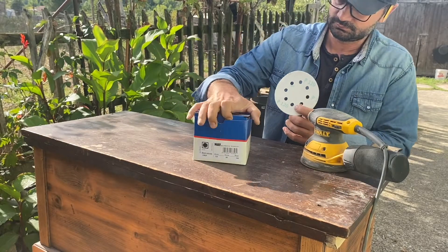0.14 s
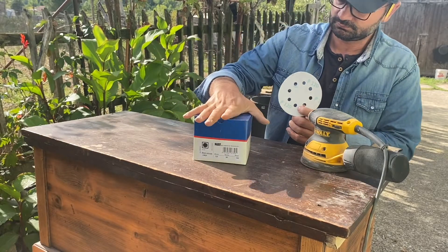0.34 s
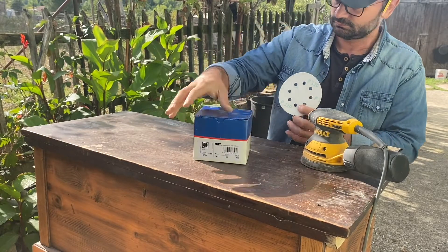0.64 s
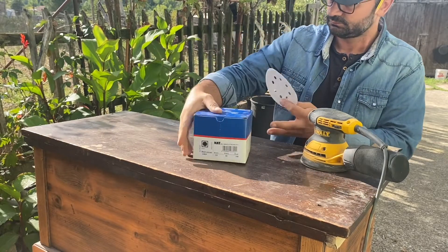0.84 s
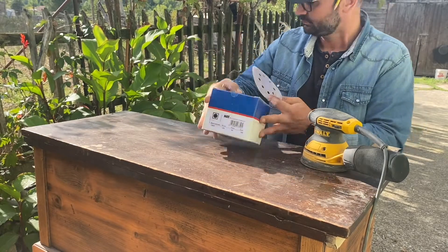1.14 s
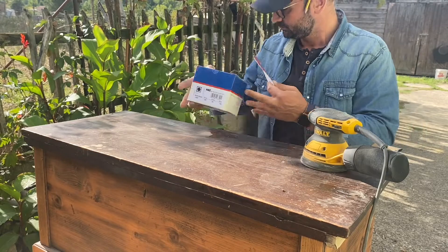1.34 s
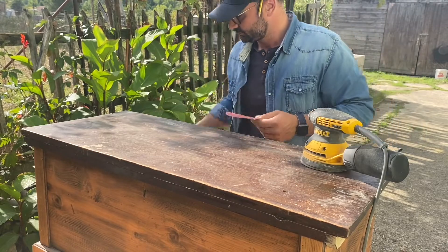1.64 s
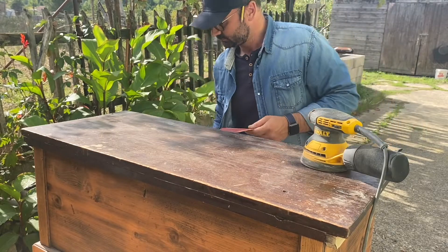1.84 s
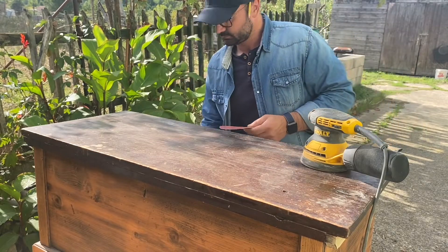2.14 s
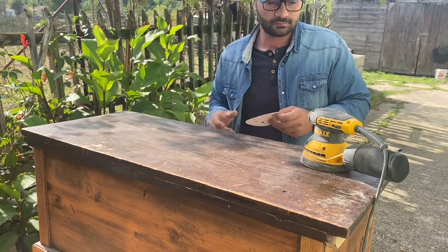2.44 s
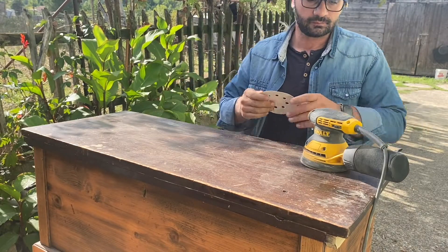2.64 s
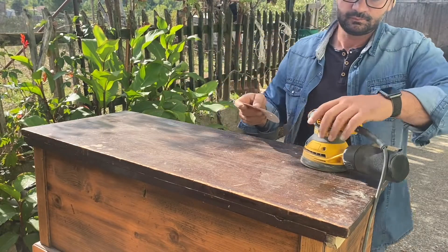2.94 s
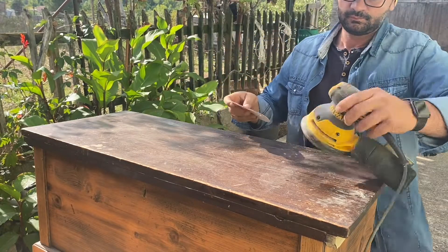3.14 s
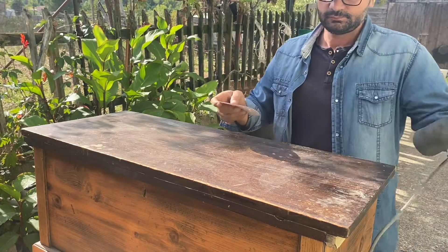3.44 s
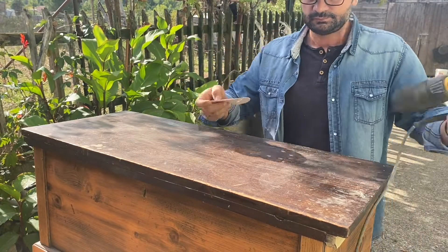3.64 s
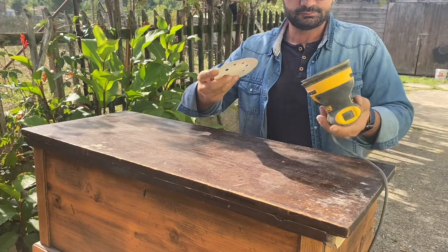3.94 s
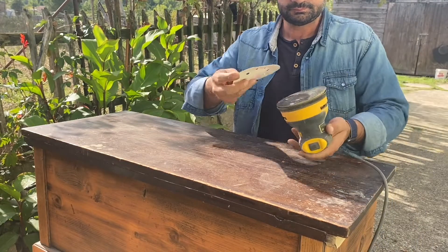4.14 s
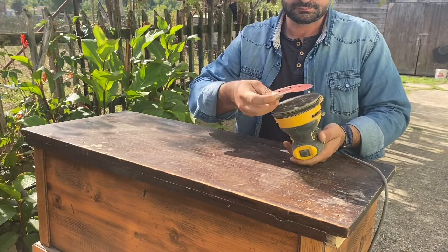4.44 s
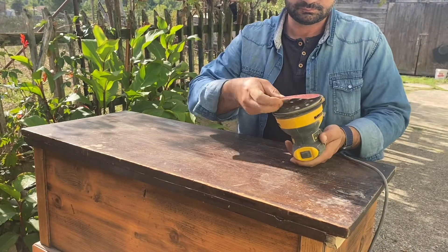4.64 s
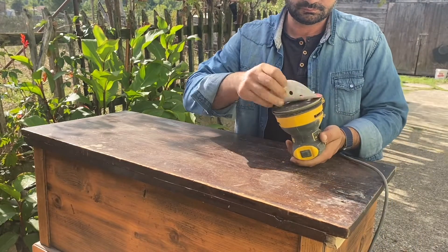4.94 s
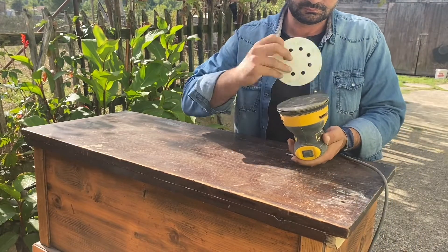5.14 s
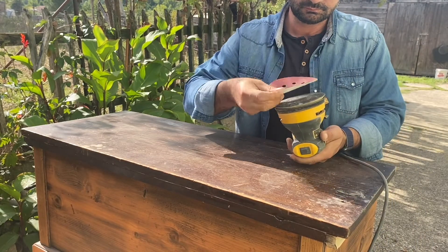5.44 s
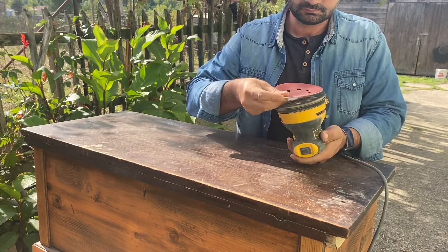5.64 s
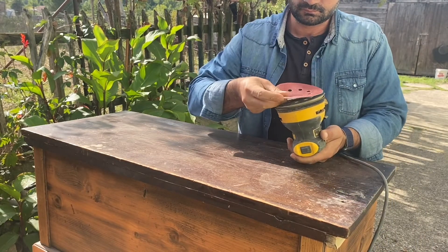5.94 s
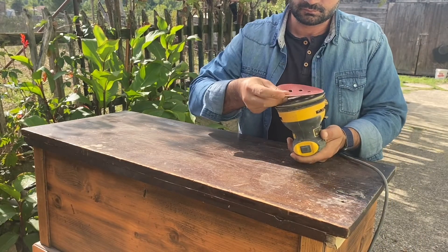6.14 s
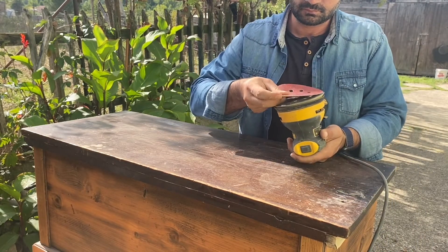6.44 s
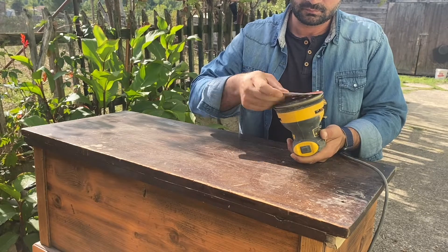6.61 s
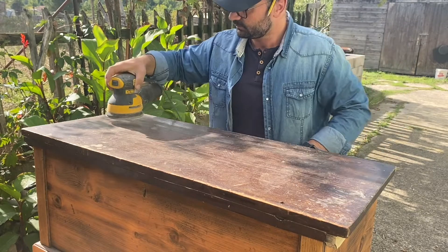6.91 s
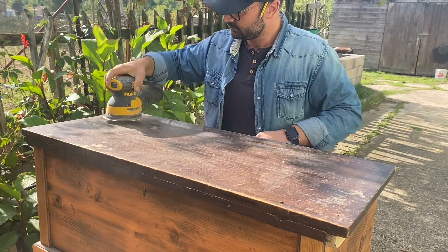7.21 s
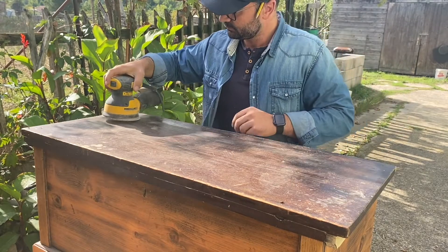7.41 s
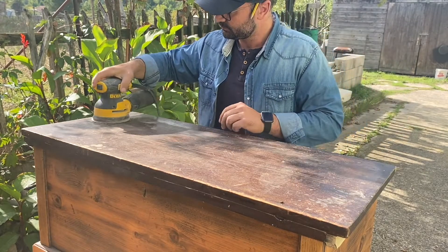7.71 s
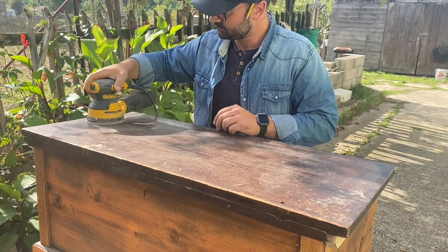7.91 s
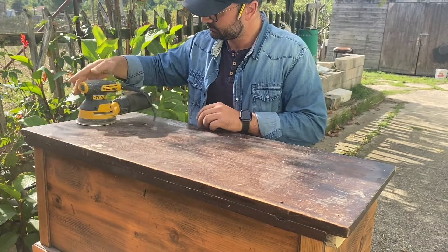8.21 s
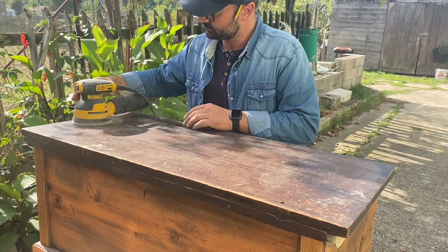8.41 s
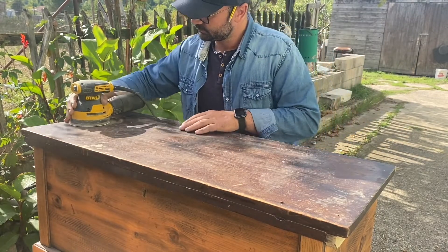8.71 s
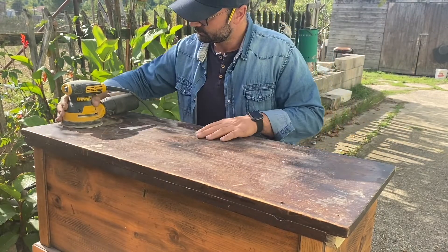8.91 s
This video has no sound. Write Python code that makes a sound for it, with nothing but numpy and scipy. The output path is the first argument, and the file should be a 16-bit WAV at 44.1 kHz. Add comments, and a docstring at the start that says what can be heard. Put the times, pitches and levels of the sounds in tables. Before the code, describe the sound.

A cardboard box knocks and rustles in a quiet garden, a sanding disc rips off its pad, then an electric sander whines up and grinds on wood.

```python
"""An orbital sander whines up to speed, bumps a wooden chest and settles on its lid, which drones under the pad.
Its tones ride on multiples of shaft speed over rushing air; chatter and scraping grit follow the pad's pressure.
Before that, in a garden, a cardboard box of sanding discs knocks and rustles as it is shut and put down,
and a disc is peeled off the hook-and-loop pad: struck modes and shaped noise. Fence and sheds answer the
knocks, taps and peel; a low outdoor rumble lies underneath."""
import sys
import numpy as np
from scipy import signal
from scipy.fft import rfft, irfft, next_fast_len
from scipy.io import wavfile
from scipy.ndimage import uniform_filter1d, map_coordinates

SR = 44100
rng = np.random.default_rng(int(sys.argv[2]) if len(sys.argv) > 2 else 0)


def store_pcm(level_fs):
    """Save levels as 16-bit WAV."""
    pcm = np.round(np.clip(level_fs, -1, 1) * 32767).astype(np.int16)
    wavfile.write(sys.argv[1], SR, np.atleast_2d(pcm).T)


N = 399987

# knocks of the box: (t/s, relative level/dB, thud/dB, crack/dB, pitch ratio)
KNOCKS = [(0.014, -36.5, -20, -32, 0.99), (0.174, -10, -11, -18.5, 0.99), (0.918, -42, -22, -10, 1.05),
          (1.385, -46.5, 5, -21, 0.84), (1.433, -44, -29, -16, 0.845), (1.453, -37, -33, -26, 1.1),
          (1.476, -31, -38, -46, 1.15), (1.517, -39, -25, -41, 1.15), (1.573, -44, -22.5, -40, 0.67),
          (1.681, -54, -22, -34, 0.63), (1.849, -43, 3, -28, 0.71), (1.914, -21, -14, -22.5, 0.88),
          (1.948, -36.5, 3, -31, 0.83), (2.029, -46.5, 2.5, -32.5, 0.76)]
# noise of knocked wood: (f/Hz, relative level/dB)
WOOD = [(100,-14),(220,-3),(330,-1.5),(480,-7.5),(780,-4.5),(1100,-23.5),(2000,-45.5)]
# bright noise of sliding paper: (f/Hz, relative level/dB)
SLIDE = [(150,-28),(1000,-12.5),(3000,-2),(5000,-2),(7200,-3.5),(9000,-4),(12000,-3.5),(15500,-7)]
# likeness of the two channels for sounds of the hands: (f/Hz, likeness 0-1)
HAND_ALIKE = [(100,1),(600,0.29),(2300,.85),(3800,.45),(6500,0.77),(10800,1)]
# likeness of the two channels for the sander, held within 0-1: (f/Hz, likeness)
SANDER_ALIKE = [(750,3.5),(900,0.78),(3000,0.73),(4500,-0.06),(6500,0.77),(8500,0.84),(10800,0.6),(11400,1)]
# sander's level difference between the microphones: (f/Hz, L-R/dB)
SANDER_BALANCE = [(60, -2), (130, -6), (270, 4), (580, -11), (1240, 2), (2640, 0.5), (5630, -1.5),
                  (12000, 0)]
# sander's phase difference between the microphones: (f/Hz, left lead/rad)
SANDER_PHASE = [(450,1.5),(900,1.62),(1800,1.3),(3000,2.15),(3800,5.2),(5500,2 * np.pi)]

# the shaft starts at START_HZ and heads for FREE_HZ until the load holds it at LOADED_HZ
ON_S, ON_RISE_S, SPIN_UP_S = 6.68, 0.027, .5
START_HZ, FREE_HZ, LOADED_HZ = 98.9, 152.8, 147.7
RUSH_POWER = 2.58  # the free-running sound grows as this power of speed


def amp(db):
    """Decibels to gain."""
    return 10 ** (np.asarray(db) / 20)


def unit(x):
    """Scale to rms 1."""
    return x / np.sqrt(np.mean(x ** 2) + 1e-20)


def clock():
    """Seconds at each sample."""
    return np.arange(N) / SR


def along(points, hz):
    """(Hz, value) points read on a log axis."""
    f, v = np.transpose(points)
    return np.interp(np.log(hz + 1), np.log(f + 1), v)


def wobble(rate):
    """A smooth random curve, rate knots a second."""
    knots = rng.standard_normal(int(N * rate / SR) + 4)
    return map_coordinates(knots, [np.arange(N) * rate / SR])


def filtered(x, response):
    """x times a complex response of frequency."""
    m = next_fast_len(x.shape[-1] + 8192)
    spectrum = rfft(x, m) * response(np.fft.rfftfreq(m, 1 / SR))
    return irfft(spectrum, m)[..., :x.shape[-1]]


def coloured(x, spectrum):
    """x given a spectrum, at rms 1."""
    return unit(filtered(x, lambda hz: amp(along(spectrum, hz))))


def noise(spectrum, grain=0.):
    """Two noises; grain spreads the sizes of their tiny impacts, in step in both."""
    sizes = np.exp(grain * rng.standard_normal(N))
    return coloured(rng.standard_normal((2, N)) * sizes, spectrum)


def patchy(x, depth_db):
    """Narrow patches of the spectrum swell and fade at random."""
    z = signal.stft(x, nperseg=1024)[2]
    field = uniform_filter1d(rng.standard_normal(z.shape[1:]), 4, 0)
    field = uniform_filter1d(field, 6, 1)
    return unit(signal.istft(z * amp(depth_db * unit(field)), nperseg=1024)[1][:, :N])


def stereo(pair, alike):
    """Two unrelated signals become partly alike channels."""
    def mix(hz):
        turn = np.arccos(np.clip(along(alike, hz), 0, 1)) / 2
        return np.array([np.cos(turn), np.sin(turn)])
    mid, side = filtered(pair, mix)
    return np.array([mid + side, mid - side])


def placed(x, balance, phase=None):
    """Level (Hz, L-R dB) and phase (Hz, radians) differences between the two channels."""
    half = np.array([[.5], [-.5]])

    def response(hz):
        lead = 0 if phase is None else along(phase, hz)
        return amp(half * along(balance, hz)) * np.exp(1j * half * lead)
    return filtered(x, response)


def add(track, s, sound):
    """Mix a sound in at s seconds."""
    part = track[..., max(round(s * SR), 0):][..., :sound.shape[-1]]
    part += sound[..., :part.shape[-1]]


def ring(modes, t, rise, lag=0., scatter_db=3.5):
    """Struck modes; bending waves bring the low ones later (lag s at 1 kHz)."""
    out = np.zeros(len(t))
    for hz, db, t60 in modes:
        age = np.maximum(t - lag * np.sqrt(10 ** 3 / hz), 0)
        decay = amp(db + scatter_db * rng.normal() - 60 * age / t60)
        out += decay * np.sin(2 * np.pi * hz * age) * (1 - np.exp(-age / rise))
    return out


def outdoors():
    """A low, slowly changing rumble under a faint hiss."""
    # distant rumble: (t/s, relative level/dB)
    swell = [(0.0, -58.5), (0.4, -54.5), (3.77, -57), (4.32, -59.5), (5.4, -59), (6.27, -65), (6.6, -61.5)]
    # outdoor noise: (f/Hz, relative level/dB)
    spectrum = [(20,-26.5),(45,-11.5),(70,-3),(100,-1.5),(150,-9),(220,-16.5),(320,-22),(480,-35.5),(900,-49),(2000,-52.5),(5000,-50.5),(12000,-61)]
    rumble = amp(1 + np.interp(clock(), *np.transpose(swell)))
    wide = stereo(rumble * noise(spectrum), [(100,.97),(400,0.72),(2000,.4)])
    return placed(wide, balance=[(100,-3.5),(1000,-2)])


def yard(x):
    """The scattered answer of fence and sheds: decaying noise, new for each channel."""
    # decay of the scattered sound: (f/Hz, t60/s)
    decay = [(150,0.46),(600,0.2),(2500,0.13),(10000,0.22)]
    hz, t, z = signal.stft(rng.standard_normal((2, SR // 2)), SR, nperseg=256)
    tail = signal.istft(z * amp(-60 * t / along(decay, hz)[:, None]), SR, nperseg=256)[1]
    tail *= 1 - np.exp(-np.arange(tail.shape[1]) / SR / .006)
    return signal.fftconvolve(x[None], tail / np.linalg.norm(tail[0]), axes=1)


def handling():
    """Card, denim and abrasive paper brush past each other: dull scuff and bright hiss."""
    # strokes of hands, sleeves and card: (start t/s, length/s, relative scuff/dB, relative hiss/dB)
    strokes = [(0.0, 0.0067, -50.5, -58), (0.035, 0.18, -53.5, -59.5), (0.25, 0.04, -61.5, -63.5),
               (0.417, .04, -58, -60.5), (0.53, 0.031, -59.5, -58), (0.587, 0.031, -61, -61.5),
               (0.668, 0.046, -81, -69), (0.771, .17, -60.5, -59), (0.953, .09, -59.5, -64.5),
               (1.126, .08, -72.5, -69.5), (1.21, 0.016, -63, -52.5), (1.24, 0.4, -71.5, -83),
               (1.652, 0.13, -70, -82.5), (1.832, 0.12, -52.5, -61), (2.097, .075, -70.5, -76.5),
               (2.525, 0.042, -70, -71.5), (2.67, .015, -79, -73), (2.786, 0.04, -72, -64),
               (2.867, 0.1, -73.5, -68.5), (2.926, 0.0179, -80, -54), (2.99, 0.22, -73, -72.5),
               (3.264, 0.075, -80, -75), (3.427, 0.13, -66, -70.5), (3.704, 0.18, -64, -67),
               (3.876, 0.23, -78, -76.5), (4.653, 0.19, -93, -58.5), (5.082, 0.22, -71.5, -65.5),
               (5.566, 0.033, -88, -68.5), (5.724, 0.035, -77, -78), (6.12, .21, -91.5, -77.5),
               (6.445, 0.07, -88.5, -67.5), (6.535, 0.061, -86.5, -61)]
    # dull scuffing noise: (f/Hz, relative level/dB)
    scuff_spectrum = [(250,-0.5),(600,-1),(1300,-6.5),(2500,-10.5),(4000,-16.5),(8000,-36)]
    attack, stroke_t60, shake_t60 = .3, 0.18, 0.13  # rise constant as a share of length; s; s
    t = clock()
    sleeves = amp(wobble(9) - 0.5 * t)  # faint denim rustle, calming by 0.5 dB/s
    power = (amp([[-83.5], [-87.5]]) * sleeves) ** 2  # rows: scuff, hiss
    age = t[:SR]
    for s, length, scuff_db, hiss_db in strokes:
        rise = 1 - np.exp(-age / (attack * length))
        stroke = rise * amp(-60 * np.maximum(age - length, 0) / stroke_t60)
        add(power, s, (amp([[scuff_db], [hiss_db]]) * stroke) ** 2)
    for s, db, *_ in KNOCKS:  # card rustles after each knock of the box
        shake = amp(db - 60 * age / shake_t60)
        add(power, s, (amp([[-25], [-38.5]]) * shake) ** 2)
    scuff, hiss = np.sqrt(power)
    card = patchy(noise(scuff_spectrum, grain=.5), 2.5)
    paper = patchy(noise(SLIDE, grain=.5), 2.5)
    rub = amp(3.5) * scuff * card * amp(1.6 * wobble(60))
    rub = rub + amp(1.5) * hiss * paper * amp(0.7 * wobble(78))
    return placed(stereo(rub, HAND_ALIKE), balance=[(500,-1),(5000,0)])


def tumble():
    """The stack of discs slips and rattles as the box is carried off: one clumpy swell of noise."""
    # rattle of the stack: (f/Hz, relative level/dB)
    stack = [(150,-24.5),(430,9.5),(660,10.5),(900,0),(1250,-7),(1400,1),(1600,-26),(2700,-36),(5000,-43)]
    middle_s, half_s = 1.506, 0.075  # half length is to 1/e
    clumps = amp(-44 + 4 * wobble(130))
    swell = clumps * np.exp(-((clock() - middle_s) / half_s) ** 2)
    return stereo(swell * noise(stack, grain=0.72), HAND_ALIKE)


def taps():
    """Tool, cord and switch tick: short bursts of plastic, wood and treble noise."""
    # light taps: (t/s, relative level/dB, treble/dB, wood/dB)
    ticks = [(0.782, -50, -10, 4), (1.222, -35, -9, -4.5), (1.264, -48.5, -23, 6.5),
             (1.321, -50.5, -6, 6.5), (2.552, -52.5, -18, -10), (3.032, -44, -22, -4),
             (3.161, -46.5, -18, 2.5), (3.422, -34, -39, -4.5), (3.568, -27.5, -29, -5),
             (4.578, -36.5, -20, -23), (4.701, -40.5, -11, -8.5), (4.722, -54, -8, -12),
             (6.66, -54, 0, -27), (6.667, -55, 16.5, -13.5)]
    # noise of a tapped plastic shell: (f/Hz, relative level/dB)
    plastic = [(400,-24),(900,0.5),(1200,-1),(1600,-0.5),(2600,-3),(3400,-9.5),(6000,-26),(12000,-43)]
    out, t = np.zeros((2, N)), np.arange(SR // 5) / SR
    for s, db, treble_db, wood_db in ticks:
        shell = amp(-3.0 - 60 * t / 0.043) * coloured(rng.standard_normal(len(t)), plastic)
        wood = amp(wood_db - 0.5 - 60 * t / 0.088) * coloured(rng.standard_normal(len(t)), WOOD)
        treble = amp(treble_db - 60 * t / .03) * coloured(rng.standard_normal(len(t)), SLIDE)
        hit = amp(db - 4.5) * (shell + wood + treble) * (1 - np.exp(-t / .0015))
        add(out, s, hit)
        add(out, s, yard(hit))
    return out


def box():
    """The hollow box knocks: a crack, its damped walls, the discs inside, and a thud underneath."""
    # wall modes: (f at pitch ratio 1/Hz, relative level/dB, t60/s)
    wall_modes = [(290,-10,0.046),(480,-7,0.035),(559.6,0.5,0.048),(696,-3.5,0.04),(1030,-12,0.022),(1410,-7.5,0.012),(1930,-18.5,0.012),(2650,-18,.012)]
    # ground and chest under the box: (f/Hz, relative level/dB)
    thud_spectrum = [(40,-14.5),(90,3),(130,4.5),(200,-7.5),(400,-7.5),(900,-42)]
    disc_spectrum = [(200,-14.5),(400,-6.5),(600,4.0),(800,-3.5),(1400,-13.0),(3000,-31.5),(8000,-52)]
    crack_spectrum = [(300,-8.5),(1200,4.0),(5500,1.0),(12000,-7)]
    out, t = np.zeros((2, N)), np.arange(SR // 3) / SR
    for s, db, thud_db, crack_db, pitch in KNOCKS:
        modes = [(hz * pitch, level, t60) for hz, level, t60 in wall_modes]
        walls = ring(modes, t, rise=.0015, lag=.0012, scatter_db=4.0)
        walls /= np.abs(walls).max()
        discs = amp(-14 - 60 * t / 0.07) * coloured(rng.standard_normal(len(t)), disc_spectrum)
        thud = amp(thud_db - 60 * t / 0.086) * (1 - np.exp(-t / 0.012))
        thud *= coloured(rng.standard_normal(len(t)), thud_spectrum)
        crack = amp(crack_db + 2 - 60 * t / 0.015)
        crack *= coloured(rng.standard_normal(len(t)), crack_spectrum)
        hit = walls + (discs + crack) * (1 - np.exp(-t / 0.00084))
        add(out, s - .001, amp(db + 3.5) * (hit + thud))
        add(out, s, amp(db - 9) * yard(hit))
    return placed(out, balance=[(150,-3),(600,-2.5),(3000,6)], phase=[(300,0.093),(600,1.0),(1500,0.3)])


def peel():
    """Hooks let go of their loops: grainy noise under a steep swell, with some clumps."""
    # clumps of hooks letting go: (t/s, relative level/dB)
    snaps = [(4.8627, -32), (4.889, -31), (4.9095, -30.5), (4.9659, -24), (5.021, -15.5), (5.0455, -21.5),
             (5.0711, -25)]
    # rip of the hooks: (f/Hz, relative level/dB)
    hooks = [(150,-35.5),(330,-11),(440,2),(650,-14),(900,-3),(1400,-11),(2250,-4),(4700,-1),(7500,-4.5),(9500,-8),(11200,-4),(13500,-7),(15500,-6)]
    start_s, hold_s = 4.95, .1  # the full pull
    rise_db_per_s, fall_db_per_s = 370.5, 541
    t, age = np.arange(SR // 30) / SR, clock() - start_s
    swell_db = rise_db_per_s * np.minimum(age, 0) - fall_db_per_s * np.maximum(age - hold_s, 0)
    pull = amp(-33 + swell_db + 3.8 * wobble(260))
    for s, db in snaps:
        add(pull, s, amp(db - 10.0 - 60 * t / 0.018))
    rip = stereo(pull * noise(hooks, grain=1.1), HAND_ALIKE)
    rip = placed(rip, balance=[(500,-1.5),(2500,0.5),(4700,0.5),(8000,-0.5)])
    return rip + amp(-8) * yard(rip[0])[:, :N]


def bumps():
    """The box settles with a thud, later the sander or an arm nudges the chest: clacking boards, booming body."""
    # bumps: (t/s, relative level/dB, rise constant/s, dullness/dB per octave)
    jolts = [(1.965,-41,0.014,3),(2.812,-42,0.019,12.5),(4.165,-47.5,.01,-0.5),(7.288,-24.5,0.017,0.5),(7.566,-21,0.0077,1.5)]
    # booming modes: (f/Hz, relative level/dB, t60/s)
    body = [(56,-12,.25),(77.5,-8.5,0.14),(105,-8,0.25),(130.7,-2,0.17),(188,0,0.11),(363,2,0.044)]
    out, t = np.zeros(N), np.arange(SR // 2) / SR
    for s, db, rise, dull_db in jolts:
        # dullness tilts the modes about 130 Hz
        modes = [(hz, level - dull_db * np.log2(hz / 130), t60) for hz, level, t60 in body]
        boards = amp(-8.5 - 60 * t / 0.113) * (1 - np.exp(-t / rise))
        boards *= coloured(rng.standard_normal(len(t)), WOOD)
        clack = boards * amp(db + 19.0) ** .5  # harder bumps clack more
        add(out, s, amp(db + 3.0) * (ring(modes, t, rise) + clack))
    return placed(out, balance=[(100,-4.0)])


def running():
    """0 before the switch is pressed, 1 just after."""
    return np.clip((clock() - ON_S) / ON_RISE_S, 0, 1)


def shaft_speed():
    """Turns a second: a quick rise that levels off under load."""
    age = np.maximum(clock() - ON_S, 0)
    return np.minimum(FREE_HZ - (FREE_HZ - START_HZ) * np.exp(-age / SPIN_UP_S), LOADED_HZ)


def shaft_angle():
    """Radians turned by the motor, with a slight flutter."""
    return 2 * np.pi * np.cumsum(shaft_speed() * (1 + .0012 * wobble(25))) / SR


def effort():
    """Gain of the free-running machine, 1 at full speed."""
    return running() * (shaft_speed() / LOADED_HZ) ** RUSH_POWER


def pressure():
    """Contact of the pad with the lid: a few grazes, then nearly steady."""
    # how firmly the pad bears on the lid: (t/s, level/dB)
    bearing = [(7.55, -41.5), (7.62, -15), (7.71, -5), (7.88, -1), (8.03, -3.5), (8.22, 0.5), (8.6, 0),
               (8.8, 0.5), (9.07, 0)]
    # the pad grazes the lid before it settles: (t/s, level/dB)
    grazes = [(7.285, -2), (7.34, -14), (7.562, -10.5)]
    rise_s, t60 = .022, .16
    t = clock()
    press = (t > bearing[0][0]) * amp(np.interp(t, *np.transpose(bearing)))
    age = t[:SR // 2]
    for s, db in grazes:
        fade = amp(db - 60 * np.maximum(age - rise_s, 0) / t60)
        add(press, s, np.minimum(age / rise_s, 1) * fade)
    return press


def rocking(depth):
    """The throb of the sander rocking on its pad: round crests, narrow dips."""
    rock_hz, crest_s = 7.115, 8.245  # mean rate, approximate time of one crest
    turn = 2 * np.pi * rock_hz * (clock() - crest_s) + 0.51 * wobble(9.8)
    return np.abs(1 + depth * np.exp(1j * turn))


def motor(angle):
    """Fan blades and commutator bars whine on high shaft orders, over the rush of cooling air."""
    # fan tones: (multiple of shaft speed, relative level/dB)
    fan_orders = [(17,-6),(23,5.5),(46,-16.5),(69,-23)]
    # armature and commutator tones, with the fan's second harmonic at 46: (multiple of shaft speed)
    bar_orders = [11.98, 23.98, 36.2, 46, 48.2, 72]
    # their levels: (relative level spinning up/dB, relative level at full speed/dB)
    bar_levels = [(-61,-50),(-51,-46),(-60,-54.5),(-73,-50),(-45,-53),(-56,-54)]
    # housing resonances the whine sweeps through: (f/Hz, width/Hz, boost/dB)
    housing = [(2350, 150, 11.5), (2646, 33, 12), (3050, 143, 11.5), (3330, 130, 11.5)]
    # cooling air: (f/Hz, relative level/dB)
    air_spectrum = [(80,-27),(220,-15),(330,-10.5),(900,-8),(2200,-12),(3100,-11.5),(3900,-22),(4800,-19.5),(6000,-20),(7500,-18.5),(10000,-22),(12400,-29),(15500,-33)]
    fan_blades, fade_s, fade_db_per_s = 23, 8.1, 8  # the fan's whine fades from fade_s on
    rush, t = effort(), clock()

    def tone(k):
        return amp(2.0 * wobble(14)) * np.sin(k * angle + .4 * wobble(90))

    blade_hz = fan_blades * shaft_speed()
    boost_db = sum(db / (1 + (2 * (blade_hz - hz) / width) ** 2) for hz, width, db in housing)
    whine = running() * amp(-50 + boost_db - fade_db_per_s * np.maximum(t - fade_s, 0))
    fan = whine * sum(amp(db) * tone(k) for k, db in fan_orders)
    fast = np.interp(t, [7.15, 7.8], [0, 1])  # share of the way to running flat out
    bars = np.zeros(N)
    for k, (early, late) in zip(bar_orders, bar_levels):
        bars += amp(early + fast * (late - early)) * tone(k)
    bars *= rush * amp(4.0)
    air = amp(-30) * rush * patchy(noise(air_spectrum), depth_db=2.5)
    air *= 1 + 0.14 * np.cos(2 * angle)
    tones = placed(fan + bars, balance=[(3000,7.6)], phase=[(1000,0.12),(3400,1.65),(6000,0.17)])
    air_balance = [(200,-1.5),(1000,1.5),(2500,0),(5000,4.5),(10000,-1)]
    return tones + placed(stereo(air, SANDER_ALIKE), air_balance, SANDER_PHASE)


def lid(angle):
    """The unbalanced pad shakes the lid at the lowest shaft orders, harder when pressed, throbbing as it rocks."""
    # drone: (multiple of shaft speed, level in the air/dB, level pressed down/dB, power of pressure,
    # rocking depth 0-1, drift of the pressed level after the change of grip/dB per s)
    lid_orders = [(1, -38, -21.5, 1.27, .08, 4.5), (2, -55, -21.5, 0.74, .5, 3.5),
                  (3, -53.5, -22.5, 2.4, 0.44, -24.5)]
    grip_s = 8.57  # the hand moves down to the side of the sander
    free, press, gripped = effort(), pressure(), np.maximum(clock() - grip_s, 0)
    drone = np.zeros(N)
    for k, free_db, pressed_db, power, depth, grip_db_per_s in lid_orders:
        pressed = amp(pressed_db + grip_db_per_s * gripped) * press ** power * rocking(depth)
        gain = np.hypot(amp(free_db) * free, pressed)
        phase = k * angle + k * 0.16 * wobble(26) + rng.uniform(0, 2 * np.pi)
        drone += gain * amp(.9 * wobble(14)) * np.sin(phase)
    return placed(drone, SANDER_BALANCE)


def sanding(angle):
    """The pad chatters once an orbit, never quite on time; the grit's scrape swells once and twice an orbit."""
    # chatter tones: (multiple of rubbing rate, relative level/dB)
    chatter_orders = [(4,-6.5),(5,-2.5),(6,1),(7,1.5),(8,-0.5),(9,-5),(10,-2),(11,-5),(12,-5),(13,-5),(15,-11),(16,-8.5)]
    # scraping grit: (f/Hz, relative level/dB)
    grit_spectrum = [(90,-11),(500,-1),(1500,-7.5),(2600,-1.5),(4200,0),(7000,-2.5),(8400,-1.5),(9800,3),(11200,1),(12300,-2),(15000,-12)]
    rattle_spectrum = [(100,0),(230,-10.0),(400,-1.0),(1700,-1),(2600,-10.5),(5000,-22)]
    press = pressure()
    chatter = amp(-31.5 + 1.5 * wobble(30)) * press ** 0.49 * rocking(.3)
    grit = amp(-35.5) * press ** 0.34
    creep = .011  # the disc creeps round, so it rubs a little slower than the shaft turns
    rubbing = angle * (1 - creep) + .2 * wobble(11) + .015 * wobble(150)
    buzz = np.zeros((2, N))
    for channel in buzz:
        for k, db in chatter_orders:
            swing = amp(db + 4 * wobble(22))
            channel += swing * np.sin(k * rubbing + 0.68 * wobble(12) + rng.uniform(0, 2 * np.pi))
    rattle = (1 + .7 * np.cos(angle)) * noise(rattle_spectrum, grain=0.88)
    growl = unit(buzz) + .3 * rattle
    orbit = 1 + 0.15 * np.cos(angle) + 0.12 * np.cos(2 * angle)
    scrape = grit * orbit * patchy(noise(grit_spectrum, grain=.5), depth_db=2.5)
    return placed(stereo(chatter * growl + scrape, SANDER_ALIKE), SANDER_BALANCE, SANDER_PHASE)


def scene():
    """Handling first, then the sander, all in the open air."""
    angle = shaft_angle()
    hands = handling() + tumble() + taps() + box() + peel()
    sander = bumps() + motor(angle) + lid(angle) + sanding(angle)
    return outdoors() + hands + sander


def record(dry):
    """The recorder's stereo widening turns the treble of the channels apart; deepest bass and top treble fall away."""
    # the treble of the two channels turns apart: (f/Hz, left lead/turns)
    widening = [(5500,0),(7500,-.17),(8300,-.5),(10300,-1),(11400,-1),(13200,-1.5),(14500,-1.5),(15200,-2)]
    top_hz = 15800  # nothing passes from here up
    response = [(20,-18),(50,1.5),(12600,-0.5),(13800,-3.5),(14800,-21.0)]
    heard = placed(dry, [(1000,0)], [(hz, 2 * np.pi * turns) for hz, turns in widening])
    return filtered(heard, lambda hz: amp(along(response, hz)) * (hz < top_hz))


dry = scene()
out = record(dry)
store_pcm(out)
```